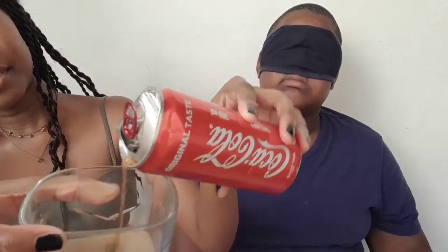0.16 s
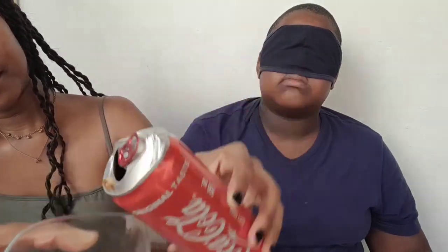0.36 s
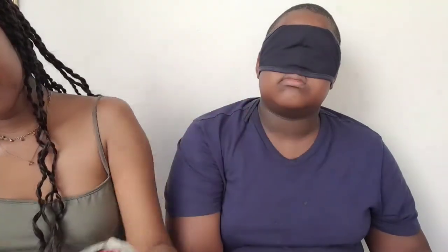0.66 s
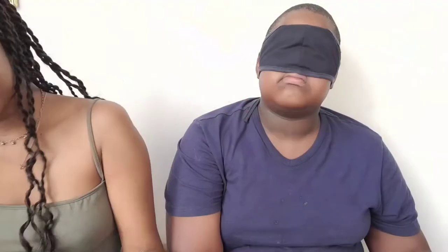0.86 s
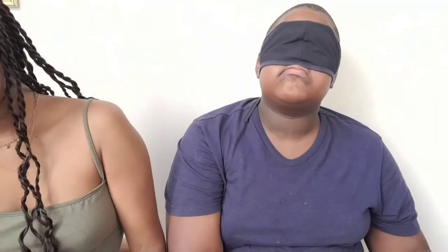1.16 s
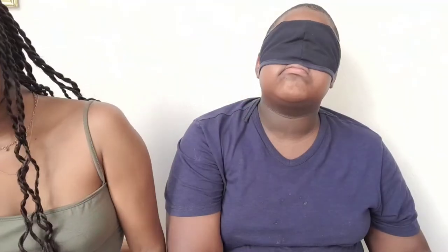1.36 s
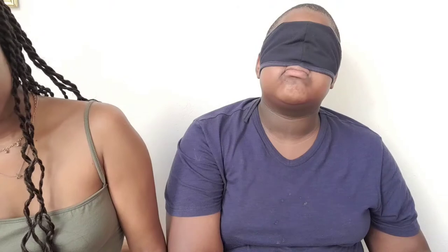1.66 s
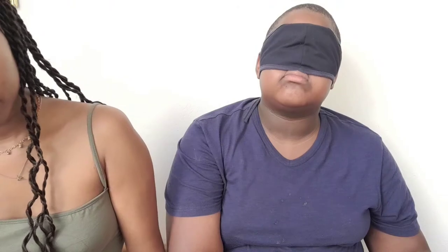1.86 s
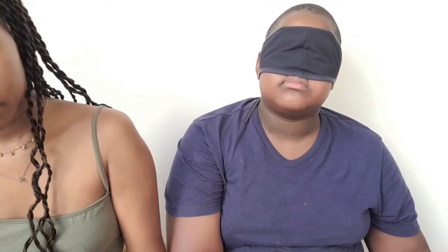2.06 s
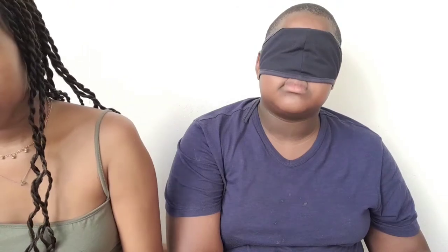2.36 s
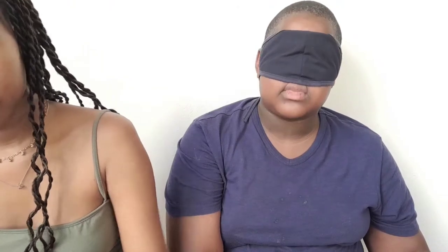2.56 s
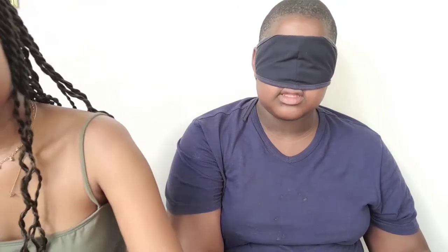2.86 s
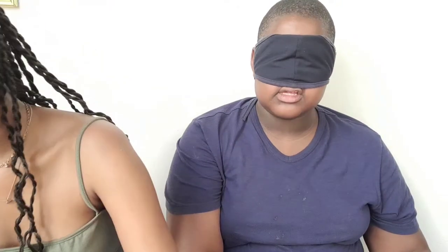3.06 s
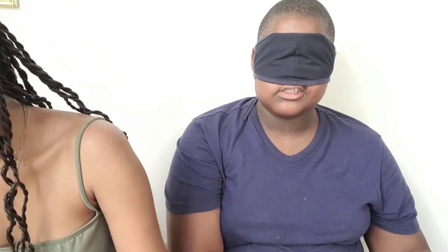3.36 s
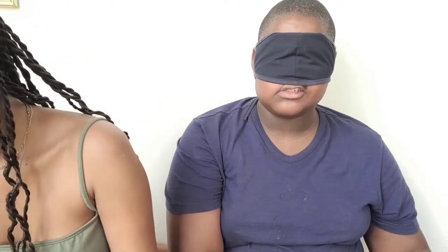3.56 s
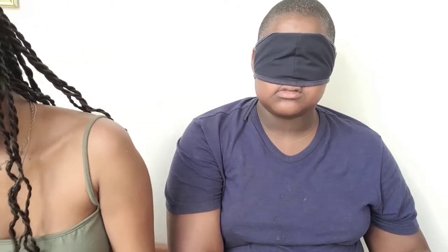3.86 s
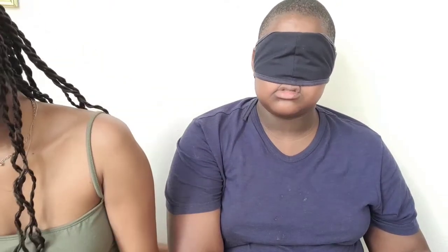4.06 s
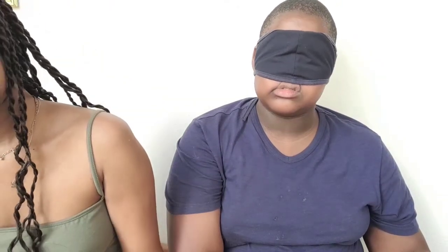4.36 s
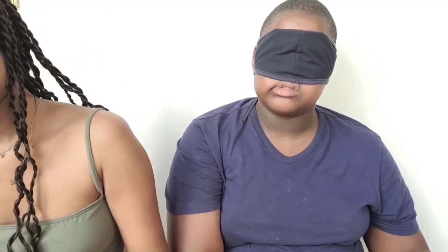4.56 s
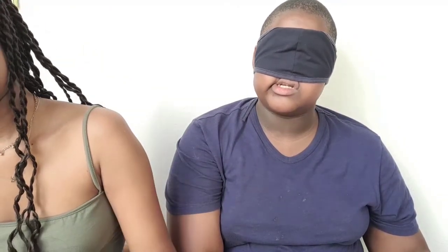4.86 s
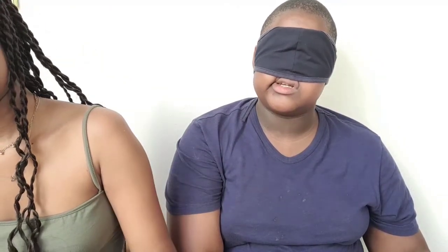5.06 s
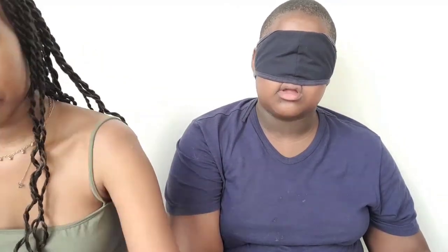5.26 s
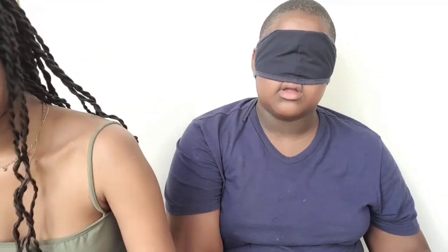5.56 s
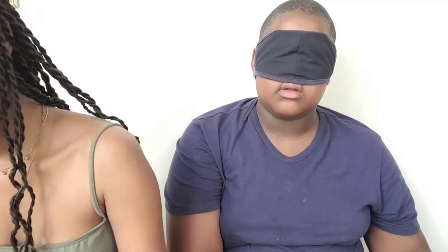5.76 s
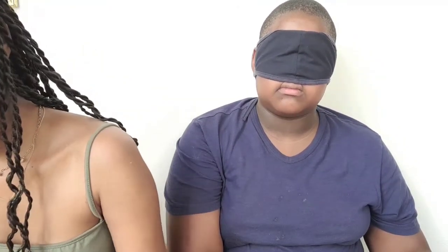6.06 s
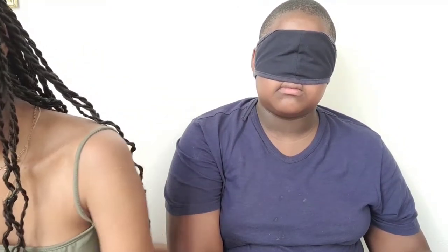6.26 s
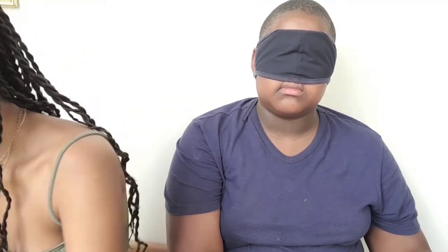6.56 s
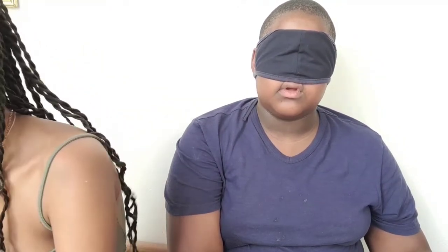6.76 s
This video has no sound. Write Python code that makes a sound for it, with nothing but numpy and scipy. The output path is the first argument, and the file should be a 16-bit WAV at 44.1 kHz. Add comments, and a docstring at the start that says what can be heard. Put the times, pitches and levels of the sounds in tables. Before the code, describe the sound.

Stereo close microphone indoors, sources slightly to the right. Soft bubbling hiss fades slowly under low room rumble and moving cloth. A can glugs once, a glass clacks twice on a wooden table, and faint squeaks and ticks surround a brief scrape and thin metal pop. Light table taps follow. The sound cuts for an instant, fizz returns, a glass thumps down with smaller rebounds, and the can wall snaps sharply.

```python
"""In a quiet, hard-walled room, drinks fizz as filtered noise with pops and sound the air columns above them.
Glasses are knocked down on a wooden table and a can glugs and snaps: decaying modes, rasping noise bursts.
Something is dragged over the table; thin squeaks (gliding harmonics) and dry ticks (noise bursts) come and go.
Hands and cloth rustle over a low rumble. The sound drops out for a moment before a fresh glass fizzes."""
import sys
import numpy as np
from scipy import signal
from scipy.fft import rfft, irfft, next_fast_len
from scipy.io import wavfile
from scipy.ndimage import uniform_filter1d

SR = 44100
rng = np.random.default_rng(int(sys.argv[2]) if len(sys.argv) > 2 else 0)


def store_wav(level_fs):
    """Save 16-bit WAV to argv[1]."""
    pcm = np.round(np.clip(np.atleast_2d(level_fs), -1, 1) * 32767)
    wavfile.write(sys.argv[1], SR, pcm.T.astype(np.int16))


N = 304543
T = np.arange(N) / SR

# Spectrum of the room rumble. Each row: frequency in Hz, relative density in dB per Hz.
RUMBLE_SPECTRUM = [(18, -42), (30, -10), (47, -7.5), (64, 4.5), (106, -3), (125, -6), (166, -7), (214, -2),
                   (271, -13.5), (301, -2), (330, -12.5), (413, -14), (447, -11), (614, -21.5), (700, -23),
                   (910, -24), (1540, -120)]
# Spectrum of hands and cloth. Each row: frequency in Hz, relative density in dB per Hz.
RUSTLE_SPECTRUM = [(150, -23.5), (250, -3), (270, -7), (302, -1), (346, -10), (451, -8.5), (544, -12.5),
                   (782, -7.5), (1110, -8.5), (1600, -8.5), (2030, -13), (2710, -13.5), (5000, -19.5),
                   (6500, -38), (11000, -120)]
# Spectrum of the bursting bubbles. Each row: frequency in Hz, relative density in dB per Hz.
FIZZ_SPECTRUM = [(1180, -22), (2000, -16), (2260, -13), (2860, -4), (3810, -4.5), (5300, -1), (7380, -2),
                 (8330, -5), (11900, -1.5), (15200, -4), (16000, -0.5)]
# Spectrum of the can's rasp. Each row: frequency in Hz, relative density in dB per Hz.
CAN_RASP_SPECTRUM = [(120, -41), (200, -24), (240, -4), (311, 1), (500, -2.5), (696, -1), (1500, -16),
                     (2420, -3), (2750, -12.5), (3310, -6.5), (4350, -17), (5630, -13), (9060, -26.5),
                     (12800, -26), (16000, -27)]
# Hands and cloth on the move. Each row: time in seconds, rustle level in dB, room rumble level in dB.
HANDLING = [(0, -64, -53), (.3, -56.5, -59), (.6, -62, -58.5), (.8, -57, -49), (1.0, -63, -57),
            (1.2, -65, -64.5), (1.62, -66.5, -62.5), (1.85, -52.5, -59.5), (2.15, -63.5, -64.5),
            (2.43, -65, -60), (2.6, -73, -56), (3.001, -80.5, -62.5), (3.42, -74, -59.5), (3.5, -61, -61.5),
            (3.86, -61, -55), (4.04, -62.5, -54.5), (4.15, -70, -57.5), (4.25, -62, -53), (4.5, -56.5, -55),
            (4.76, -68, -59.5), (5.3, -76, -59.5), (5.335, -58, -52.5), (5.6, -59, -57.5),
            (5.85, -55.5, -58.5), (6.1, -63.5, -60.5), (6.55, -68.5, -63.5), (6.9, -68, -61)]
# Fizzing drinks. Each row: start in seconds, end in seconds, fizz level in dB, steady time in seconds,
# fizz change after that in dB/s, air column pitch in Hz, column level in dB, column change in dB/s.
DRINKS = [(0, 5.31, -59, 0.49, -3.5, 1150, -61, -8), (5.33, 7, -62, .1, -1.5, 1309, -69, 4)]
# Air above the drink, open at one end. Each row: multiple of the upper tone, half width in Hz, level in dB.
COLUMN_TONES = [(1 / 3, 81, -0.58), (1, 238, 0.67)]
# Decay of the room by band. Each row: centre in Hz, t60 in seconds, relative level in dB,
# likeness of the two channels from 0 to 1.
ROOM_BANDS = [(158.3, 0.81, 2, 0.96), (370, 0.45, 9, 0.57), (905, 0.53, 4.5, 0), (2690, 0.17, 1, 0),
              (5880, 0.39, -35, 0.05), (13300, 0.1, 1.5, 0)]
# Small dry ticks. Each row: start in seconds, level in dB, centre in Hz, width in Hz, decay time in seconds.
TICKS = [(2.34, -48, 6500, 9000, 0.0046), (2.363, -49.5, 5000, 6000, 0.0067),
         (3.169, -41, 9000, 9000, 0.0056), (3.506, -48, 5800, 3000, 0.0044), (5.18, -44, 4150, 400, 0.0035)]
# Thin squeaks. Each row: start in seconds, end in seconds, first and last nominal pitch in Hz,
# partials as (harmonic number, level in dB).
SQUEAKS = [(2.04, 2.27, 2760, 2950, [(1, -59), (2, -66)]), (2.05, 2.2, 4355, 4360, [(1, -62)]),
           (2.39, 2.62, 2590, 2603, [(1, -68), (4, -63)]), (2.72, 2.93, 2215, 2275, [(5, -73), (6, -64)]),
           (2.85, 3.16, 4350, 4340, [(1, -59)]), (3.02, 3.13, 2200, 2210, [(1, -68)]),
           (3.47, 3.72, 1690, 1700, [(1, -68), (2, -67)]), (4.5, 4.9, 1700, 1705, [(1, -66), (2, -68),
           (3, -70), (4, -72)]), (4.65, 5.0, 2245, 2238, [(1, -64), (2, -74), (3, -73)]),
           (5.2, 5.32, 3615, 3615, [(1, -69), (2, -81)])]
# The can glugs as it is tipped back. Each row: start in seconds, pitch in Hz, level in dB,
# hold in seconds, t60 in seconds.
GLUG_TONES = [(0.291, 493.6, -42, 0.032, 0.39), (0.306, 242.6, -57.5, 0.13, 0.9),
              (0.375, 1058, -54, .01, 0.18)]
# Resonances excited by the drag. Each row: centre in Hz, width in Hz, relative density in dB.
DRAG_RESONANCES = [(360, 51, 7.5), (770, 41, -2), (1680, 180, -8), (2630, 690, -15.5), (3100, 150, -10),
                   (5500, 1100, -41)]
# Snaps of the can wall. Each row: start in seconds, rasp level in dB, ring level in dB,
# spectral tilt in dB per octave, crackle decay time in seconds.
SNAPS = [(3.285, -29, -45.5, -1, .005), (6.8057, -18, -22.5, 2.5, 0.015)]
# Modes of the thin metal can. Each row: frequency in Hz, relative level in dB, t60 in seconds.
CAN_MODES = [(509, -0.5, 0.1), (611, 9, 0.11), (738, -8.5, 0.15), (2170, -9, 0.026), (2458, 2, 0.063),
             (2540, -16, 0.068), (2930, 3.5, 0.056), (3190, -7, 0.095), (5780, 2, 0.054), (6380, -6, 0.04)]
# Modes of the table top. Each row: frequency in Hz, relative level in dB, t60 in seconds.
TABLE_MODES = [(199, -3.5, 0.065), (315, -18.5, 0.36), (373.6, 2.5, 0.092), (476.5, 7.5, 0.056),
               (531.5, 3, 0.09), (629, 3.5, 0.072), (767.4, 6, 0.038), (806, 1, 0.022), (940.4, -3, 0.13),
               (1070, 7.5, 0.044), (1118, -6.5, 0.036), (1118, -8.5, 0.029), (1137, -11, 0.18),
               (1274, -2.5, 0.032), (1315, -17, 0.019), (1407, -26.5, 0.03), (1598, 6.5, 0.0071),
               (1820, 10, 0.013), (2000, 12.5, 0.026), (2496, 17.5, 0.011), (2760, 10, 0.023)]
# Modes of the drinking glass. Each row: frequency in Hz, relative level in dB, t60 in seconds.
GLASS_MODES = [(2070, -9, .15), (2097, -3, .42), (2132, -7, .25), (2340, -12, .15), (4620, -6, .1),
               (5830, -2, .08), (7983, -5, .04)]
# The contact itself, one quick push. Each row: frequency in Hz, relative level in dB, t60 in seconds.
THUD_MODES = [(1207, -3, 0.0036)]
# Knocks on the table, mostly of a glass; the one at 3.284 s belongs to the can's snap.
# Each row: start in seconds, level in dB, best answering pitch of the table in Hz,
# breadth in octaves, then in dB relative to that level: glass ring, rim overtones, tick, thud,
# rattle of the table, boom in the room.
KNOCKS = [(1.631, -19, 1125, 0.63, -17, -25, -10.5, 1, -21.5, -32),
          (1.655, -25, 990, 0.83, -9.5, -42, -28, -26, -30, -25),
          (1.818, -23.5, 1083, 0.56, -20, -38, -19, -27, -22, -28.5),
          (1.852, -30, 980, 1.04, -14, -43, -28, -37, -35, -28.5),
          (3.284, -36.5, 560, 1.37, -60, -60, 8, 2, -12, -20),
          (3.503, -45.5, 437, 0.73, -41, -45, 6.5, -20, -9.5, -31),
          (3.531, -41.5, 466, 0.9, -45, -43, -30, -28, -12, -17.5),
          (4.189, -38, 910, 0.79, -48, -21, -27, -30, -27, -27.5),
          (4.199, -33, 930, 0.22, -24, -31, -36, -6, -10, -18),
          (4.219, -48, 920, 0.47, -33, -45, -38, -11, -20, -10),
          (5.702, -17.5, 634, 1.68, -14, -42, -42, 7, -28, -32),
          (5.822, -27.5, 1370, 0.25, -25.5, -45, -40, -40, -25, -28.5),
          (5.856, -36.5, 570, 0.73, -8.5, -45, -40, -40, -21, -25),
          (5.872, -29.5, 582, 0.33, -24, -45, -40, -40, -15.5, -32)]

RUSTLE_SWAY_DB, RUMBLE_SWAY_DB, GLASS_SWAY_DB = 1, 2, 6  # scales of the random level walks
DEEP_HZ, DEEP_SHARE = 137.3, 0.39  # below this the rumble follows only a share of the swells
CLOTH_HISS_DB = -9.5  # treble of the rustle, relative to its body
BOOM_PEAK_S, RATTLE_DECAY_S = 0.055, 0.029
DRAG_PEAK_S, DRAG_DB, DRAG_RISE_DB_S, DRAG_FALL_DB_S = 3.187, -41.5, 240, 548
SNAP_RISE_S, CONTACT_S = 0.0019, 0.0015  # onset ramps of snap and table
BLOW_SCATTER_DB = 1.5
WET_DB, SMALL_WET_DB = 3.5, -8  # room level, and how much less of it the small sounds excite
LEFT_DB, LEFT_LAG_S = -1.5, 0.00011  # left channel relative to right
DROPOUT_START_S, DROPOUT_END_S = 5.302, 5.3335
BOTTOM_HZ, TOP_HZ = 38.7, 15650


def undb(db):
    """Amplitude is ten to the power of decibels over twenty."""
    return 10 ** (np.asarray(db) / 20)


def unit(x):
    """Normalisation by the root mean square, over all channels together."""
    return x / np.sqrt(np.mean(x ** 2))


def band(x, hz, width):
    """A single resonance, with gain 1 at its centre."""
    return signal.lfilter(*signal.iirpeak(hz, hz / width, SR), x)


def spectrum_of(size):
    """The discrete Fourier transform samples frequency in equal steps."""
    return np.arange(size // 2 + 1) * SR / size


def shape(x, spectrum):
    """Spectral colouring: gain in dB is interpolated over log frequency."""
    hz, db = np.transpose(spectrum)
    size = next_fast_len(N)
    f = np.maximum(spectrum_of(size), 1)
    gain = undb(np.interp(np.log(f), np.log(hz), db, left=-90, right=-90))
    return irfft(rfft(x, size) * gain, size)[..., :N]


def walk(rate):
    """Slow fluctuation: random levels held for 1 / rate seconds and smoothed twice."""
    k = int(SR / rate)
    held = np.repeat(rng.standard_normal(N // k + 1), k)
    return uniform_filter1d(uniform_filter1d(held, k), k)[:N]


def wide_noise(alike):
    """Partial coherence: sum and difference noises give two channels the correlation `alike`."""
    mid, side = rng.standard_normal((2, N))
    return np.sqrt(1 + alike) * mid + np.sqrt(1 - alike) * side * np.array([[1], [-1]])


def ring(modes, extra_db):
    """Modal superposition: damped sines start together, their levels scattered at every blow."""
    hz, db, t60 = np.transpose(modes)[:, :, None]
    t = T[:SR * 3 // 4]
    gain = undb(db + extra_db + BLOW_SCATTER_DB * rng.standard_normal((len(modes), 1)))
    return np.sum(gain * undb(-60 * t / t60) * np.sin(2 * np.pi * hz * t), axis=0)


def crack(length):
    """Impulsive noise: a random burst with exponential decay time `length`."""
    t = T[:SR // 8]
    return rng.standard_normal(len(t)) * np.exp(-t / length)


def add(out, s, x):
    """Linear superposition: x is added to out from time s."""
    i = int(s * SR)
    out[i:i + len(x)] += x[:N - i]


def booms():
    """Build-up and decay of low room energy: a gain of the form u exp(1 - u) after each blow."""
    out, u = np.zeros(N), T[:SR] / BOOM_PEAK_S
    for s, db, *_, boom_db in KNOCKS:
        add(out, s, undb(db + boom_db) * u * np.exp(1 - u))
    return out


def room_rumble(rumble_db):
    """Low-pitched coloured noise, its deepest band swelling less than the rest."""
    swell_db = 20 * np.log10(np.hypot(undb(rumble_db), booms()))
    rumble = unit(shape(wide_noise(0.61), RUMBLE_SPECTRUM))
    deep = signal.filtfilt(*signal.butter(2, DEEP_HZ, fs=SR), rumble)
    upper = rumble - deep
    mean_db = np.mean(swell_db)
    deep_db = mean_db + DEEP_SHARE * (swell_db - mean_db)
    deep_gain = undb(deep_db + RUMBLE_SWAY_DB * walk(2.8))
    return deep * deep_gain + upper * undb(swell_db + RUMBLE_SWAY_DB * walk(9.8))


def cloth_rustle(rustle_db):
    """Friction of hands and cloth: coloured noise with irregular amplitude."""
    uneven = wide_noise(0.117) * undb(1.6 * walk(60))
    return unit(shape(uneven, RUSTLE_SPECTRUM)) * undb(rustle_db + RUSTLE_SWAY_DB * walk(16))


def fizz_and_cloth_hiss(rustle_db):
    """Bubble bursts as randomly accented treble noise, the hiss of cloth adding in power."""
    fizz_gain = np.zeros(N)
    for start, end, db, steady, fade_db, *_ in DRINKS:
        on = (T >= start) & (T < end)
        fizz_gain += on * undb(db + fade_db * np.maximum(T - start - steady, 0))
    pops = 1 + 3 * (rng.random(N) < .03) * rng.random(N)
    hiss_gain = np.hypot(fizz_gain, undb(rustle_db + CLOTH_HISS_DB))
    return unit(shape(wide_noise(0.036) * pops, FIZZ_SPECTRUM)) * hiss_gain * undb(0.39 * walk(24))


def air_column():
    """Resonance of a column open at one end: narrow noise at a tone and at a third of it."""
    gain, column_hz = np.zeros((2, N))
    for start, end, *_, hz, column_db, change_db in DRINKS:
        on = (T >= start) & (T < end)
        gain += on * undb(column_db + change_db * (T - start))
        column_hz += on * hz
    phase = 2 * np.pi * np.cumsum(column_hz * (1 + .03 * walk(6))) / SR
    column = 0
    for multiple, half_width, db in COLUMN_TONES:
        # noise in a moving resonance: two slow noises on the sine and cosine of its centre
        lowpass = signal.butter(2, half_width, fs=SR)
        on_sine, on_cosine = [unit(signal.lfilter(*lowpass, wide_noise(0.52))) for _ in range(2)]
        tone = on_sine * np.sin(multiple * phase) + on_cosine * np.cos(multiple * phase)
        column = column + undb(db) * tone
    return column * gain * undb(2.5 * walk(7))


def background():
    """Superposition of the rumble, the rustle, the fizz and the air column."""
    s, *levels = np.transpose(HANDLING)
    rustle_db, rumble_db = (np.interp(T, s, level) for level in levels)
    return room_rumble(rumble_db) + cloth_rustle(rustle_db) + fizz_and_cloth_hiss(rustle_db) + air_column()


def room(x):
    """Reverberation between hard walls: x is convolved with noise decaying at a rate set for each band."""
    t = T[:SR]
    tail = 0
    for hz, t60, db, alike in ROOM_BANDS:
        noise = band(wide_noise(alike)[:, :SR], hz, hz)
        tail = tail + noise * undb(db - 60 * t / t60) / np.sqrt(hz * t60)
    tail = tail * np.minimum(t / 0.0038, 1)
    flat = signal.lfilter([1, -.9], 1, tail)  # equal energy an octave becomes an even spectrum
    response = flat / np.sqrt(np.sum(flat ** 2) / 2)
    return signal.fftconvolve(x[None], response, axes=1)[:, :N]


def ticks():
    """Short impulses: decaying noise bursts pass through one resonance each."""
    out = np.zeros(N)
    for s, db, hz, width, length in TICKS:
        add(out, s, undb(db) * band(crack(length), hz, width))
    return out


def squeaks():
    """Harmonic series on a gliding, wavering fundamental, swelling and dying with a flutter."""
    out = np.zeros(N)
    waver, flutter = walk(150), walk(70)
    for start, end, first_hz, last_hz, partials in SQUEAKS:
        i = slice(int(start * SR), int(end * SR))
        u = np.linspace(0, 1, len(T[i]), endpoint=False)
        pitch = (first_hz + (last_hz - first_hz) * u) * (1 + .014 * waver[i])
        phase = 2 * np.pi * np.cumsum(pitch) / SR
        tone = sum(undb(db) * np.sin(k * phase) for k, db in partials)
        out[i] += tone * np.sin(np.pi * u ** .5) ** 1.3 * undb(3 * flutter[i])
    return out


def glug():
    """Damped resonance: each tone rises quickly, holds and then decays exponentially."""
    out = np.zeros(N)
    t = T[:SR // 2]
    for s, hz, db, hold, t60 in GLUG_TONES:
        gain = undb(db - 60 * np.maximum(t - hold, 0) / t60) * np.minimum(t / 0.0032, 1)
        add(out, s, gain * np.sin(2 * np.pi * hz * t))
    return out


def drag():
    """Sliding friction: uneven noise excites resonances as the pull builds up, then lets go."""
    slips = rng.standard_normal(N) * undb(1.6 * walk(90))
    body = sum(undb(db) * unit(band(slips, hz, width)) * np.sqrt(width) for hz, width, db in DRAG_RESONANCES)
    pull_db = np.minimum(DRAG_RISE_DB_S * (T - DRAG_PEAK_S), DRAG_FALL_DB_S * (DRAG_PEAK_S - T))
    return undb(DRAG_DB + pull_db) * (unit(body) + undb(-12.5) * unit(slips))


def snaps():
    """Buckling of a thin wall: a broad rasp, with sparse cracks each ringing the can's modes."""
    out = np.zeros(N)
    for s, rasp_db, ring_db, tilt_db, length in SNAPS:
        burst = crack(length) * np.minimum(T[:SR // 8] / SNAP_RISE_S, 1)
        sparse_cracks = burst * (rng.random(len(burst)) < .03)
        metal = signal.fftconvolve(ring(CAN_MODES, 0), sparse_cracks)
        add(out, s, undb(ring_db) * metal / np.max(np.abs(metal)))
        rasp = np.zeros(N)
        add(rasp, s, burst)
        tilted = [(hz, db + tilt_db * np.log2(hz / 1000)) for hz, db in CAN_RASP_SPECTRUM]
        rasp = shape(rasp, tilted) * (T >= s)  # nothing sounds ahead of the snap
        out += undb(rasp_db) * rasp / np.max(np.abs(rasp))
    return out


def knocks():
    """Impact excitation: table modes near one pitch, rattle, thud, tick; the glass rings at a rough, uneven level."""
    table, glass = np.zeros((2, N))
    table_hz = np.array(TABLE_MODES)[:, :1]
    is_rim = np.array(GLASS_MODES)[:, :1] > 3000
    for s, db, best_hz, octaves, glass_db, rim_db, tick_db, thud_db, rattle_db, _ in KNOCKS:
        wood = ring(TABLE_MODES, -6 * (np.log2(table_hz / best_hz) / octaves) ** 2)
        wood = wood * np.minimum(T[:len(wood)] / CONTACT_S, 1)
        add(table, s, undb(db) * (wood / np.max(np.abs(wood)) - ring(THUD_MODES, thud_db)))
        add(table, s, undb(db + tick_db) * band(crack(0.0011), 3770, 3190))
        loose = rng.standard_normal(SR // 3)
        for _ in range(2):
            loose = band(loose, best_hz, best_hz * octaves)
        rattle = unit(loose) * np.exp(-T[:len(loose)] / RATTLE_DECAY_S)
        add(table, s, undb(db + rattle_db) * rattle)
        add(glass, s, undb(db) * ring(GLASS_MODES, np.where(is_rim, rim_db, glass_db)))
    return table, glass * undb(GLASS_SWAY_DB * walk(45.27))


def scene():
    """Interaural-type cues: everything lies to the right, so the left channel is later and softer."""
    table, glass = knocks()
    blows = table + snaps()
    small = glass + glug() + drag() + squeaks() + ticks()
    # thin, small sounds stir the room less than blows on the table
    reverberation = undb(WET_DB) * room(blows + undb(SMALL_WET_DB) * small)
    left, right = blows + small + reverberation + background()
    size = next_fast_len(N)
    lag = np.exp(-2j * np.pi * spectrum_of(size) * LEFT_LAG_S)  # a delay is a linear phase shift
    left = irfft(rfft(left, size) * lag, size)[:N]
    return np.array([left * undb(LEFT_DB / 2), right * undb(-LEFT_DB / 2)])


def record(dry):
    """Gating and band limitation: the sound drops out briefly; the lowest bass and the top are cut."""
    outside_s = np.maximum(DROPOUT_START_S - T, T - DROPOUT_END_S)
    gate = np.clip(outside_s / .002, undb(-45), 1)
    port = signal.lfilter(*signal.butter(2, BOTTOM_HZ, "high", fs=SR), dry * gate)
    return signal.sosfilt(signal.ellip(10, .2, 70, TOP_HZ, fs=SR, output="sos"), port)


dry = scene()
out = record(dry)
store_wav(out)
```